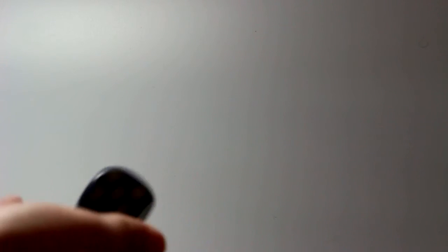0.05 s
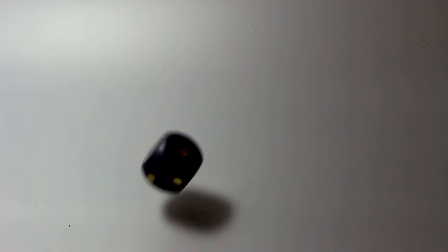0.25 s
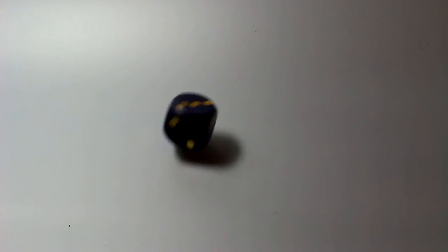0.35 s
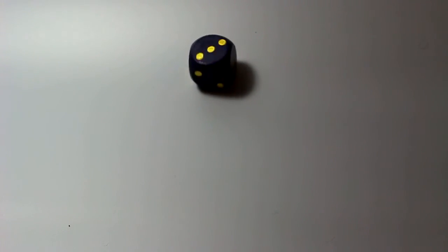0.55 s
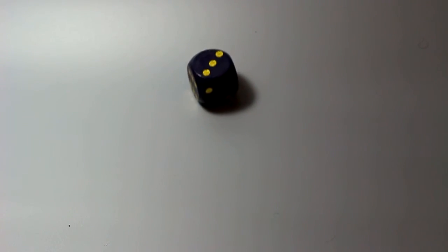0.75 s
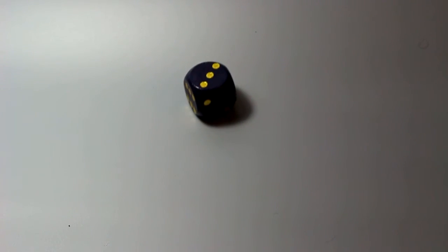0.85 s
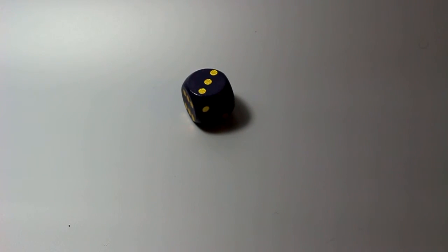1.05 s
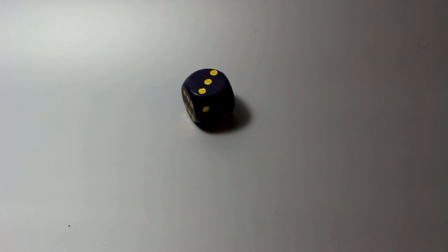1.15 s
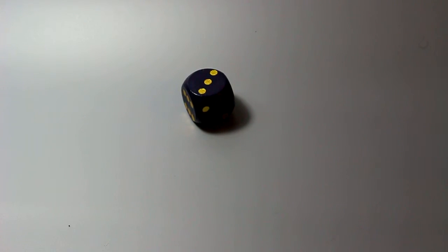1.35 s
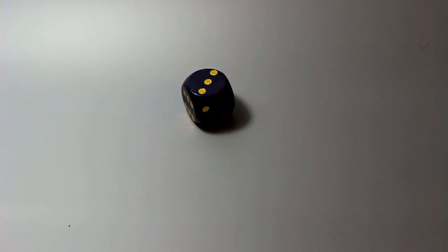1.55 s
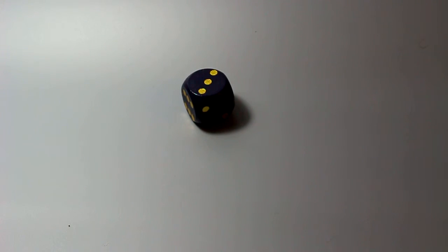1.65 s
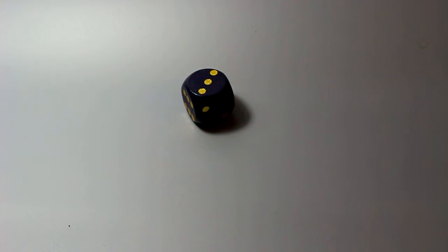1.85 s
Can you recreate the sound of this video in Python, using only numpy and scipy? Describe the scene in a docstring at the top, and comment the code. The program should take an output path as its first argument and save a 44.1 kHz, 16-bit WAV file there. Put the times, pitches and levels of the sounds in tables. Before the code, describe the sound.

A plastic die lands on a hollow table with three sharp, close knocks at about 0.2, 0.35 and 0.4 seconds, the hardest slightly overloading the microphone. It skids with a short hiss around 0.5 seconds and settles with a softer knock at 0.65. Soft rubbing fades by one second, leaving a faint hiss and a tiny click at 1.5. A small room adds echo and quiet noise.

```python
"""Die tossed on a hollow table.

A plastic die knocks three times close to the microphone, ringing the table top's modes. It skids
with a short hiss and drops onto a face; soft rubbing, a faint hiss and a faint click follow.
A small room adds echo and quiet noise. The hardest knocks overload the microphone."""
import sys
import numpy as np
from scipy import signal
from scipy.fft import rfft, irfft
from scipy.io import wavfile
from scipy.ndimage import uniform_filter1d

SR = 44100
rng = np.random.default_rng(int(sys.argv[2]) if len(sys.argv) > 2 else 0)


def pcm_store(signal):
    """Save signal as 16-bit PCM."""
    levels = np.round(np.clip(np.atleast_2d(signal), -1, 1) * 32767)
    wavfile.write(sys.argv[1], SR, levels.astype(np.int16).T)


N = 83790

# Die contacts (time [s], table level [dB], contact time [ms], spot pitch [Hz], spot lift [dB],
# tick level [dB], tick dulling [ms], bright tail level [dB])
CONTACTS = [(.2090, -16, 0.28, 1580, 6, -1.5, 0.082, -45), (0.2115, 2, 0.6, 983, 4.5, -11, 0.11, -31),
            (.3430, 0.5, 0.7, 243, 1.5, -11, 0.097, -9), (0.419, -4, 0.76, 1230, 6.5, -6.5, 0.31, -10.5),
            (0.6356, -16, 3.6, 414, 6.5, -30, 0.058, -16), (0.6414, -19.5, 5.8, 97, 12.5, -36, 0.095, -39),
            (0.6541, -28, 5.1, 110, 17.5, -32, 0.14, -26)]
BASS_CUT_HZ = 223  # the table radiates little below this
def knocks():
    """Each contact rings the table, duller the longer it lasts; the die ticks and a hiss trails off."""
    out = 0
    for start_s, table_db, contact_ms, spot_hz, spot_db, tick_db, dulling_ms, tail_db in CONTACTS:
        top = undb(table_db) * soften(table_top(spot_hz, spot_db), contact_ms)
        tick = undb(tick_db) * soften(die_tick(), dulling_ms)
        tail = undb(tail_db) * bright_tail()
        out = out + at(start_s, top + tick + tail)
    return signal.sosfilt(signal.butter(3, BASS_CUT_HZ, "high", fs=SR, output="sos"), out)


# Distinct table modes (frequency [Hz], level [dB], t60 [s])
TABLE_MODES = [(103.6, -15, .45), (168.7, -14, .2), (236.5, -3.5, 0.098), (371.3, -4.5, 0.083),
               (438.6, -6.5, 0.096), (600.6, -5.5, .16), (641, -12.5, .2), (769, -15.5, 0.13),
               (813, -15.5, 0.078), (921.3, -2, 0.06), (1040, -19, .2), (1127, -10, 0.11),
               (1193.5, -8, 0.099), (1256, -12.5, 0.26), (1302, -11, 0.23), (1408, -7.5, 0.051),
               (1593, -8, 0.12), (1813, -11.5, 0.062)]
# Dense table modes (frequency [Hz], density [dB], t60 [s])
TABLE_BANDS = [(90, -10, 0.22), (304.3, -5.5, .15), (800, -3, 0.16), (1338, 6, 0.059), (1907, -9.5, .06),
               (2450, 1, 0.0543), (3270, -11, 0.12), (6000, -19.5, 0.0533), (15000, -34, .04)]
MODES_DB, DENSE_DB, SPOT_SPREAD_DB = -10, 17, 2.3
def table_top(spot_hz, spot_db):
    """The hollow top rings; the struck spot varies its modes' levels and lifts those near one pitch."""
    offsets_db = SPOT_SPREAD_DB * rng.standard_normal(len(TABLE_MODES))
    modes = sum(undb(MODES_DB + db + offset_db) * mode(hz, t60_s)
                for (hz, db, t60_s), offset_db in zip(TABLE_MODES, offsets_db))
    top = modes + undb(DENSE_DB) * ring(TABLE_BANDS, width=0.27)
    near_pitch = signal.lfilter(*signal.iirpeak(spot_hz, Q=6.7, fs=SR), top)
    return top + (undb(spot_db) - 1) * near_pitch


# Ring of the die (frequency [Hz], density [dB], t60 [s])
TICK_BANDS = [(900, -10, .03), (2292, 8.5, .03), (4500, -5.5, 0.038), (9340, -9.5, 0.039),
              (15500, -19, 0.032)]
TICK_DB, SNAP_DB, TICK_WIDTH = 5.5, 0.5, 0.48
def die_tick():
    """The plastic die rings briefly, opening with one sharp swing."""
    snap = undb(SNAP_DB) * mode(hz=2300, t60_s=0.004, wave=np.cos)
    return undb(TICK_DB) * ring(TICK_BANDS, TICK_WIDTH) + snap


# Bright tail (frequency [Hz], density [dB], t60 [s])
TAIL_BANDS = [(1000, -10, 0.14), (2500, 3.5, 0.12), (4500, -3.5, 0.22), (9010, -7.5, .17),
              (15000, -23.5, 0.084)]
def bright_tail():
    """A bright, fading hiss after each knock."""
    return ring(TAIL_BANDS, TICK_WIDTH)


# Skid envelope (time [s], level [dB])
SKID_ENVELOPE = [(.45, -56), (.475, -37), (.5, -31.5), (.53, -32), (.555, -43), (.62, -49), (.72, -67)]
# Skid spectrum (frequency [Hz], density [dB])
SKID_SPECTRUM = [(40, -19), (90, 4), (200, 9), (700, 3), (1500, -3.5), (2800, -2.5), (4800, -8),
                 (6500, -7.5), (8500, -15.5), (15000, -27.5)]
def skid():
    """The die slides with a short, bright friction hiss."""
    return swell(SKID_ENVELOPE, SKID_SPECTRUM, width=0.45, grain_hz=430, grain_db=0.5)


# Rubbing envelope (time [s], level [dB])
RUB_ENVELOPE = [(.55, -71), (.66, -48.5), (.78, -43.5), (.86, -45.5), (.95, -51.5), (1.08, -73)]
# Rubbing spectrum (frequency [Hz], density [dB])
RUB_SPECTRUM = [(59, -43), (100, -16), (305, -2), (545, -7), (630, -5.5), (1220, -13.5), (1470, -14.5),
                (4490, -22), (14000, -40)]
def rubbing():
    """Softer, darker friction on the table."""
    return swell(RUB_ENVELOPE, RUB_SPECTRUM, width=0.36, grain_hz=140, grain_db=-0.2)


# Click ring (frequency [Hz], density [dB], t60 [s])
CLICK_BANDS = [(2500, -14, .03), (4200, -8, 0.022), (7000, -0.5, 0.022), (9000, -27, .03)]
CLICK_S, CLICK_DB = 1.496, -27.5
def faint_click():
    """One small, high click."""
    return at(CLICK_S, undb(CLICK_DB) * ring(CLICK_BANDS, TICK_WIDTH))


# Room response (frequency [Hz], density [dB], t60 [s])
ROOM_BANDS = [(100.7, 0.5, 0.67), (300, -1.5, .6), (700, 2, 0.44), (1300, 1.5, 0.4), (2500, -4, 0.46),
              (5900, -2, 0.43), (14100, -17, 0.1946)]
ECHO_DELAY_S, ECHO_DB = 0.005, -13
def room_echo(near):
    """The small room returns the near sounds as a diffuse tail."""
    response = at(ECHO_DELAY_S, ring(ROOM_BANDS, width=0.44))
    return undb(ECHO_DB) * signal.fftconvolve(near.mean(0)[None], response, axes=1)[:, :N]


# Hiss envelope (time [s], level [dB])
HISS_ENVELOPE = [(.85, -62), (1.0, -55), (1.3, -59), (1.45, -65), (1.7, -84)]
# Hiss spectrum (frequency [Hz], density [dB])
HISS_SPECTRUM = [(200, -12), (1400, -3), (1950, 6), (2700, -10), (4200, 1), (6500, -17), (14000, -44)]
def faint_hiss():
    """A faint hiss lingers after the rubbing."""
    return swell(HISS_ENVELOPE, HISS_SPECTRUM, width=0.7, grain_hz=41, grain_db=1.2)


# Room noise spectrum (frequency [Hz], density [dB])
AIR_SPECTRUM = [(30, -19), (70, -14.5), (120, -8.5), (160, -12), (197, -0.5), (240, -9), (320, -7.5),
                (600, -13.5), (1400, -15.5), (2000, -17), (5000, -22), (10000, -28.5), (15500, -38)]
AIR_DB, AIR_WAVER_DB = -55.5, -0.04
def room_noise():
    """Quiet, steady noise, nearly unrelated left and right."""
    return undb(AIR_DB + AIR_WAVER_DB * flutter(rate_hz=15)) * noise(AIR_SPECTRUM, width=1)


def undb(db):
    """Decibels to gain."""
    return 10 ** (np.asarray(db) / 20)


def at(start_s, x):
    """Delay a sound to its start time."""
    return np.pad(x, ((0, 0), (int(start_s * SR), 0)))[:, :N]


def mode(hz, t60_s, wave=np.sin):
    """One decaying vibration."""
    t = np.arange(N) / SR
    return wave(2 * np.pi * hz * t) * np.exp(-np.log(1000) * t / t60_s)


def soften(x, push_ms):
    """A push of this length barely excites faster vibrations."""
    cutoff_hz = min(1000 / push_ms, SR * .45)
    return signal.sosfilt(signal.butter(2, cutoff_hz, fs=SR, output="sos"), x)


NARROW_HZ = 1400  # near bass reaches both microphone ports alike
def noise(spectrum, width):
    """Coloured stereo noise with unit mid level; width is side over mid, below 1 narrower in the bass."""
    points, hz = np.array(spectrum), np.arange(N // 2 + 1) * SR / N + 1
    gain = undb(np.interp(np.log(hz), np.log(points[:, 0]), points[:, 1]))
    side_gain = hz / np.hypot(hz, NARROW_HZ * max(1 - width, 0))
    white = rfft(rng.standard_normal((2, N)))
    mid, side = irfft(white * [gain, gain * side_gain], N)
    return (mid + width * side * np.array([[1], [-1]])) / mid.std()


def ring(bands, width):
    """Unit-energy response of countless modes; each band decays at its own rate."""
    t, log_hz = np.arange(N) / SR, np.log(np.arange(N // 2 + 1) * SR / N + 1)
    bands, spectrum = np.array(bands), rfft(noise(bands, width))
    out = 0
    for share, t60_s in zip(np.eye(len(bands)), bands[:, 2]):
        band = irfft(spectrum * np.interp(log_hz, np.log(bands[:, 0]), share), N)
        out = out + band * np.exp(-np.log(1000) * t / t60_s)
    return out / np.sqrt(np.sum(out ** 2) / 2)


def flutter(rate_hz):
    """Smooth random wobble with a spread of 1."""
    size = int(SR / rate_hz)
    wobble = uniform_filter1d(uniform_filter1d(rng.standard_normal(N), size), size)
    return wobble / wobble.std()


def swell(envelope, spectrum, width, grain_hz, grain_db):
    """Grainy noise that follows a level curve."""
    db = np.interp(np.arange(N) / SR, *np.array(envelope).T, left=-np.inf, right=-np.inf)
    return undb(db + grain_db * flutter(grain_hz)) * noise(spectrum, width)


BALANCE_DB = 0.65  # left over right
def scene():
    """The near sounds with the room's echo and background."""
    near = knocks() + skid() + rubbing() + faint_click()
    mix = near + room_echo(near) + room_noise() + faint_hiss()
    return mix * undb(np.array([[BALANCE_DB], [-BALANCE_DB]]) / 2)


CLIP_LEVEL, TOP_HZ = 0.98, 15700
def record(dry):
    """The microphone clips the hardest peaks; the highest treble is cut."""
    clipped = np.clip(dry, -CLIP_LEVEL, CLIP_LEVEL)
    return signal.sosfilt(signal.ellip(8, .2, 70, TOP_HZ, fs=SR, output="sos"), clipped)


dry = scene()
out = record(dry)
pcm_store(out)
```